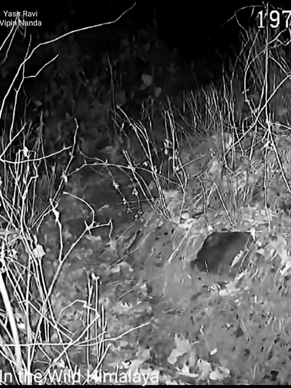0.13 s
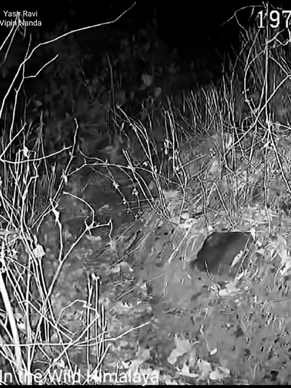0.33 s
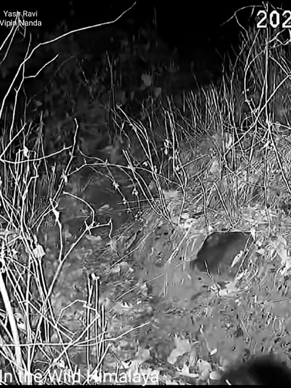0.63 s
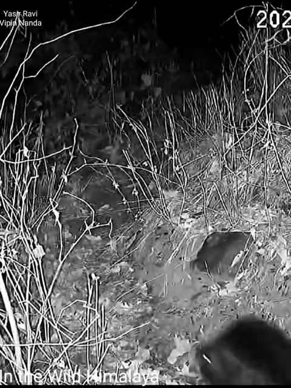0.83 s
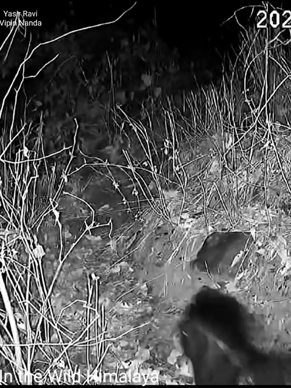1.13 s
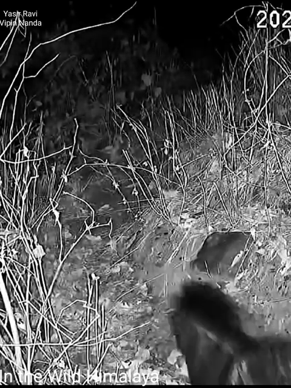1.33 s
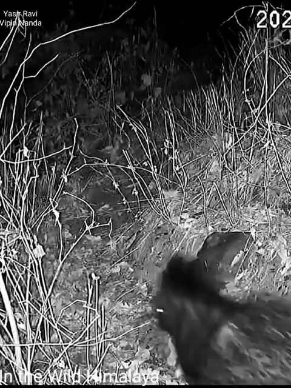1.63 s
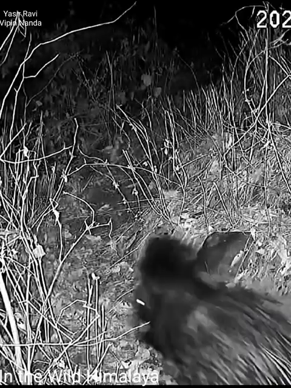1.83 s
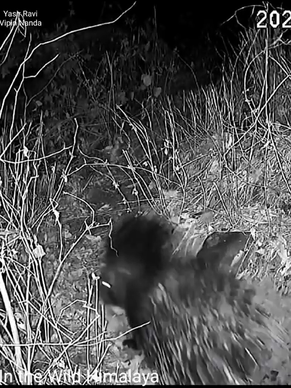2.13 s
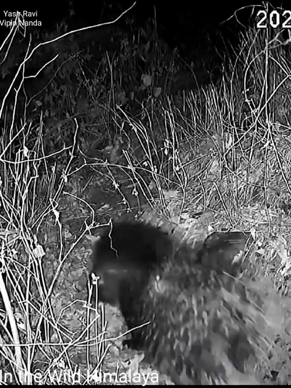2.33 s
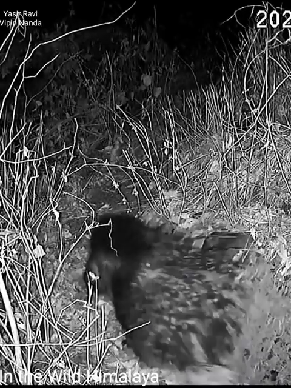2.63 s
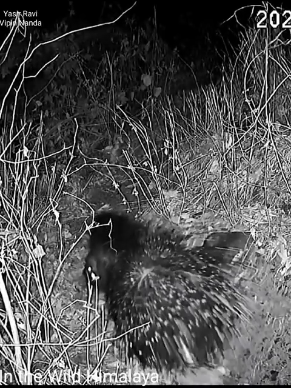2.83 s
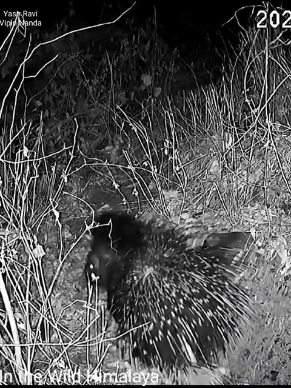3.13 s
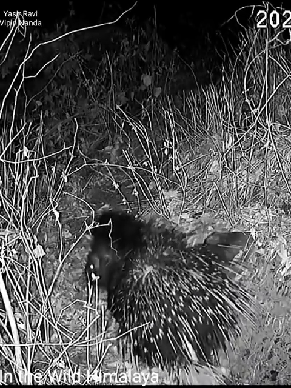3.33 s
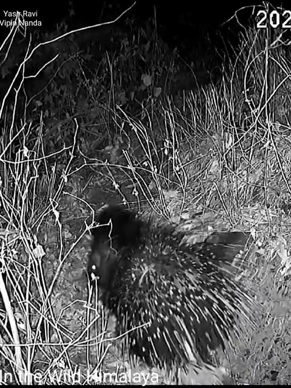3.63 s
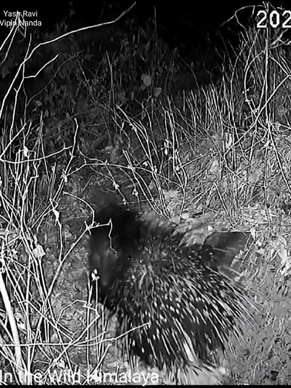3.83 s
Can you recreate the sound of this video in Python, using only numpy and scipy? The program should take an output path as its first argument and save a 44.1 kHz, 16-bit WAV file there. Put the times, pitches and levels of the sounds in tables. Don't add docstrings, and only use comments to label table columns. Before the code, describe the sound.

Crickets trilling at night, near singers over a far shimmering chorus and low airy rumble

```python
import sys
import numpy as np
from scipy import signal
from scipy.fft import rfft, irfft, next_fast_len
from scipy.io import wavfile
from scipy.ndimage import map_coordinates

SR = 44100
rng = np.random.default_rng(int(sys.argv[2]) if len(sys.argv) > 2 else 0)


def attenuation_scalar(level_db):
    decades = np.asarray(level_db, float) / 20
    return 10 ** decades


def inscribe(sig):
    pcm = np.round(np.clip(np.atleast_2d(sig).T, -1, 1) * 32767)
    wavfile.write(sys.argv[1], SR, pcm.astype(np.int16))


N = 176400


def unit(x):
    return x / np.sqrt(np.mean(x ** 2) + 1e-20)


def along(points, hz):
    f, v = np.transpose(points)
    return np.interp(np.log(hz + 1), np.log(f + 1), v)


def wobble(rate, size=N):
    knots = rng.standard_normal(int(size * rate / SR) + 4)
    return map_coordinates(knots, [np.arange(size) * rate / SR])


def coloured(x, points):
    m = next_fast_len(N + 8192)
    hz = np.fft.rfftfreq(m, 1 / SR)
    return irfft(rfft(x, m) * attenuation_scalar(along(points, hz)), m)[..., :N]


def add(out, start_s, sound, pan_db):
    i = max(round(start_s * SR), 0)
    part = sound[:max(N - i, 0)]
    sides = attenuation_scalar([[pan_db / 2], [-pan_db / 2]]) / np.cosh(pan_db / 2 * np.log(10) / 20)
    out[:, i:i + len(part)] += part * sides


def tone(hz, second_db, third_db):
    phase = 2 * np.pi * (np.cumsum(hz) / SR + rng.random())
    return 2 * (np.sin(phase) + attenuation_scalar(second_db) * np.sin(2 * phase) + attenuation_scalar(third_db) * np.sin(3 * phase))


# loudest moment in seconds, level in dB.
SLOW = [(0.21, -30), (0.301, -30.5), (0.4, -29.5), (0.494, -30), (0.587, -31), (0.681, -30.5), (0.777, -30),
        (0.874, -28), (0.968, -28.5), (1.061, -28.5), (1.158, -29), (1.249, -31)]
ECHOING = [(0.479, -45), (0.591, -43), (0.699, -36.6), (0.788, -37), (0.895, -33.5)]
HIGH = [(0.989, -31), (1.046, -29.5), (1.103, -26), (1.158, -25), (1.217, -26.5), (1.275, -26),
        (1.335, -25), (1.392, -26), (1.45, -25.5), (1.513, -26.5), (1.574, -26.5), (1.638, -26)]
LOUD = [(1.862, -39), (1.943, -36), (1.984, -25.5), (2.033, -23.5), (2.081, -24), (2.131, -24),
        (2.181, -23.5), (2.227, -24), (2.279, -24), (2.328, -23.5), (2.379, -24), (2.429, -24),
        (2.478, -23.5)]
THIN = [(2.34, -51), (2.384, -55), (2.442, -48), (2.49, -47), (2.545, -51), (2.597, -49), (2.653, -49),
        (2.707, -47), (2.759, -49), (2.815, -47), (2.87, -51), (2.927, -50)]
LATE = [(3.077, -48), (3.17, -41.5), (3.264, -40.5), (3.357, -39.5), (3.445, -37.5), (3.541, -38.5),
        (3.629, -38.5), (3.721, -37), (3.805, -39), (3.901, -37)]
STRAY = [(1.783, -46.5), (3.992, -39)]
# pitch in Hz, start above it in Hz, final drop in Hz,
# loudness at the start as a share (below 0 counts as 0), left-right difference in dB,
# second and third harmonic in dB, flutter in dB.
VOICES = [(SLOW, (4100.5, 139, 323, -0.22, 5.5, -24, -28, 1.3)),
          (ECHOING, (4360, 230, 250, .3, 0.1, -30, -40, 1.2)),
          (HIGH, (4598, -101, 491, 0, 1, -27.5, -42, 1.24)),
          (LOUD, (4340.5, -15, 372, 0.65, -1.5, -20, -33, -1.2)),
          (THIN, (5038, 220, 330, .4, -3, -28, -40, 1)),
          (LATE, (4241.5, 110.5, 280, -0.54, -1.5, -25.5, -38, -0.1)),
          (STRAY, (4233, 61, 250, 0.65, -1, -26, -35, 0.2))]
# swell in seconds, fall in seconds,
# how long before the loudest moment the sag begins in seconds, attack in seconds.
STROKES = [
    (.04, .009, .002, .014),
    (.022, .008, .004, .01),
    (.025, .011, .007, .01),
    (.024, .008, .005, .005),
    (.007, .005, .001, .004),
    (.04, .009, .004, .012),
    (.038, .009, .004, .012),
]


def singers():
    kick_s, kick_db, sag_curve = .0045, -9, 2.47
    out = np.zeros((2, N))
    for (notes, voice), (swell, fall, sag, attack) in zip(VOICES, STROKES):
        hz, lead_hz, drop_hz, share, pan_db, second_db, third_db, flutter_db = voice
        t = np.arange(-swell, fall + kick_s, 1 / SR)
        early = np.clip(-t / swell, 0, 1)
        late = np.clip((t + sag) / (sag + fall + kick_s), 0, 1)
        onset = np.clip((t + swell) / attack, 0, 1)
        rise = 1 - (1 - np.clip(share, 0, 1)) * early
        decay = 1 - np.clip(t / fall, 0, 1) ** 3.7
        kick = attenuation_scalar(kick_db) * np.sin(np.pi * np.clip((t - fall) / kick_s, 0, 1))
        stroke = onset * rise * decay + kick
        for s, db in notes:
            pitch = hz + lead_hz * early ** 2 - drop_hz * late ** sag_curve
            pitch = pitch + 14 * wobble(205, size=len(t)) + 8 * rng.standard_normal()
            size = stroke * attenuation_scalar(db - 5 + flutter_db * wobble(286, size=len(t)))
            note = size * tone(pitch, second_db, third_db)
            add(out, s - swell, note, pan_db + 0.38 * rng.standard_normal())
    return out


def sweep(top_hz, foot_hz, fall_hz_per_s):
    t = np.arange(-.002, max(top_hz - foot_hz, 99) / fall_hz_per_s, 1 / SR)
    u = np.linspace(0, 1, len(t))
    flutter_db = 2 * wobble(450, size=2000)[:len(t)]
    shape = np.sin(np.pi * u ** .8) * attenuation_scalar(flutter_db)
    pitch = top_hz - fall_hz_per_s * t[-1] * u ** 1.3 + 20 * wobble(350, size=2000)[:len(t)]
    return .5 * shape * tone(pitch, -29, -21)


# first stroke in seconds, period in seconds, number of strokes,
# strokes needed to warm up, fall of pitch in Hz per second.
TRILLS = [
    (.918, .02822, 16, 5, 55000),
    (1.26, .0291, 14, 6, 65000),
    (1.834, .0302, 7, 3, 60000),
    (2.565, .02828, 16, 6, 53000),
    (3.061, .02903, 15, 8, 62000),
]
# first top in Hz, last top in Hz, foot in Hz.
RANGES = [(4000, 4400, 3500), (4000, 4600, 3600), (3900, 4000, 3450), (3900, 4450, 3520),
          (3850, 4630, 3700)]
# level in dB, left-right difference in dB.
SWEEPS = [(-38, 2.5), (-39, 13), (-47, 5), (-38, 1.5), (-36, 12)]


def sweepers():
    mark_hz, warm_db = 3750, -8.5
    out = np.zeros((2, N))
    for trill, (low_hz, high_hz, foot_hz), (db, pan_db) in zip(TRILLS, RANGES, SWEEPS):
        first, period, count, warm, fall = trill
        for k in range(count):
            cold = max(1 - k / warm, 0)
            top = high_hz + (low_hz - high_hz) * cold + 20 * rng.standard_normal()
            s = first + k * period - (top - mark_hz) / fall
            level = attenuation_scalar(db + warm_db * cold ** 2 + 0.39 * rng.standard_normal())
            add(out, s, level * sweep(top, foot_hz, fall), pan_db)
    return out


# middle of the croak in seconds, level in dB, left-right difference in dB.
CROAKS = [
    (1.501, -52.5, -3),
    (2.735, -45, -13),
]


def frog():
    pitch_hz, period_s, pulse_s, span_s = 1470, .0132, .0035, .028
    out = np.zeros((2, N))
    t = np.arange(-.08, .08, 1 / SR)
    beat_s = ((t / period_s + .5) % 1 - .5) * period_s
    shape = np.exp(-(t / span_s) ** 2 - (beat_s / pulse_s) ** 2)
    for s, db, pan_db in CROAKS:
        add(out, s - .08, attenuation_scalar(db) * shape * np.sin(2 * np.pi * pitch_hz * beat_s), pan_db)
    return out


def echoes(x):
    t60_s, delay_s = 0.16, 0.0088
    slope_db, slope_s, slope_spread_s = 11, .043, .004
    t = np.arange(SR // 3) / SR
    tail = rng.standard_normal((2, len(t))) * attenuation_scalar(-60 * t / t60_s) * (t > delay_s)
    tail = tail * (1 + attenuation_scalar(slope_db) * np.exp(-((t - slope_s) / slope_spread_s) ** 2))
    dull = signal.lfilter(*signal.butter(2, 6000, fs=SR), x.mean(0))
    return signal.fftconvolve(dull[None], tail / np.linalg.norm(tail[0]), axes=1)[:, :N]


# frequency in Hz, level in dB.
CHORUS = [(3050, -20.5), (3400, -13), (3800, -3.5), (4300, 2), (4620, -11), (4800, -41.5)]
# frequency in Hz, level in dB.
LOW_CHORUS = [(3100, -25.5), (3450, -0.5), (3750, 0), (4000, -23.5)]


def chorus():
    strokes_per_s, stroke_share, chorus_db = 300, 0.75, -50.5
    low_db, low_fade_db = -5, -10
    out = np.zeros((2, N))
    for s, top, db, pan in rng.random((int(strokes_per_s * N / SR), 4)):
        stroke = sweep(3700 + 1300 * top, 3100 + 1200 * top, 60000)
        add(out, s * N / SR, attenuation_scalar(5.2 * db) * stroke, 24 * (pan - .45))
    blur = unit(coloured(rng.standard_normal((2, N)), CHORUS))
    deep = unit(coloured(rng.standard_normal((2, N)), LOW_CHORUS))
    deep_level = attenuation_scalar(low_db + low_fade_db * np.arange(N) / N + 4.1 * wobble(30.05))
    shimmer = stroke_share * unit(coloured(out, CHORUS)) + blur + deep_level * deep
    return attenuation_scalar(chorus_db + 1.4 * wobble(1.71)) * shimmer


# frequency in Hz, level in dB.
AIR = [(25, -12), (70, 0), (130, -3), (300, -8), (1000, -17), (2500, -24), (6000, -26.5), (15500, -69)]
# frequency in Hz, level in dB.
HISS = [(1500, -11.5), (4000, -11), (8000, 1.5), (15600, -1.5)]
# frequency in Hz, likeness from 0 to 1.
ALIKE = [(30, 0.53), (90, 0.3), (200, 0.11), (500, .02), (5000, 0.074), (8000, 0.25)]


def air():
    air_db, hiss_db = -49, -57
    m = next_fast_len(N)
    hz = np.fft.rfftfreq(m, 1 / SR)
    turn = np.arccos(np.clip(along(ALIKE, hz), -1, 1)) / 2
    mid, side = irfft(rfft(rng.standard_normal((2, m))) * [np.cos(turn), np.sin(turn)], m)[:, :N]
    wash = unit(coloured(np.array([mid + side, mid - side]), AIR))
    hiss = unit(coloured(rng.standard_normal(N), HISS))
    return attenuation_scalar(air_db + 0.31 * wobble(3.23)) * wash + attenuation_scalar(hiss_db) * hiss


def scene():
    near = singers() + sweepers() + frog()
    return near + attenuation_scalar(-12) * echoes(near) + chorus() + air()


def low_pass(x):
    return signal.sosfilt(signal.butter(12, 17030, fs=SR, output="sos"), x)


def record(dry):
    start_s, loop, loops, top_hz = .083, 941, 4, 15830
    a = round(start_s * SR)
    b = a + loop * loops
    stutter = np.tile(dry[:, b - loop:b], loops)
    x = np.concatenate([0 * dry[:, :a], stutter, dry[:, b:]], axis=1)
    x = x * np.clip((np.arange(N) - a) / (0.0093 * SR), 0, 1)
    x = irfft(rfft(x) * (np.fft.rfftfreq(N, 1 / SR) < top_hz), N)
    return low_pass(x)


dry = scene()
out = record(dry)
inscribe(out)
```